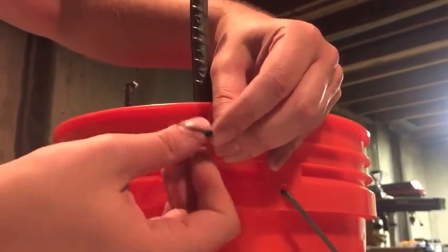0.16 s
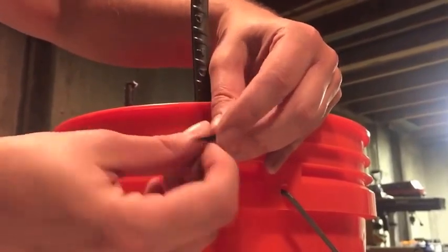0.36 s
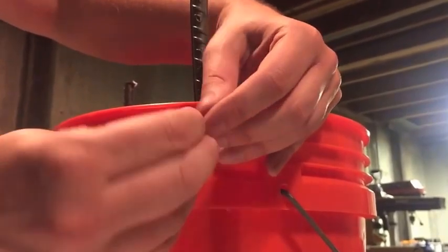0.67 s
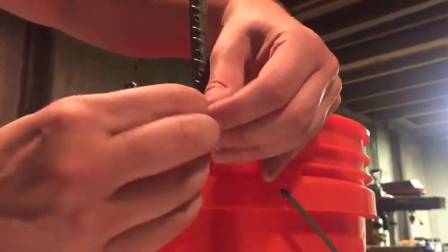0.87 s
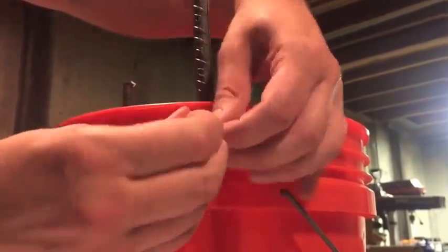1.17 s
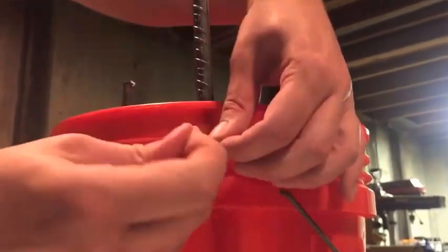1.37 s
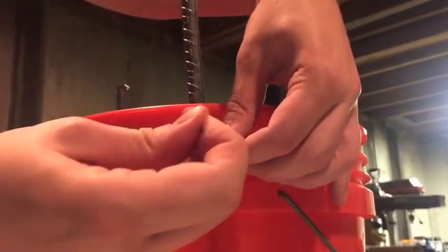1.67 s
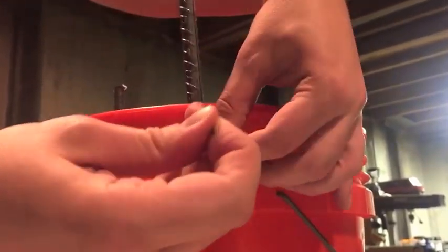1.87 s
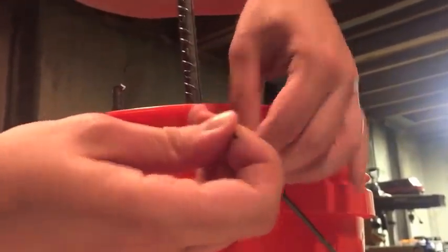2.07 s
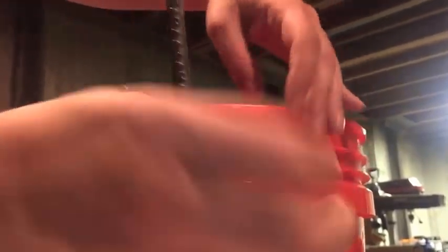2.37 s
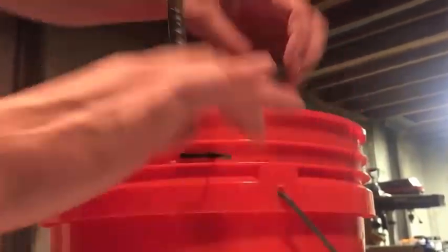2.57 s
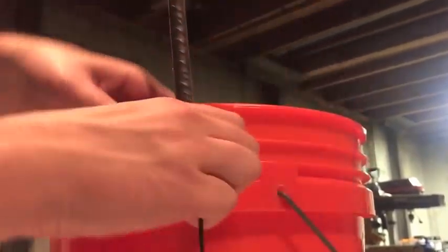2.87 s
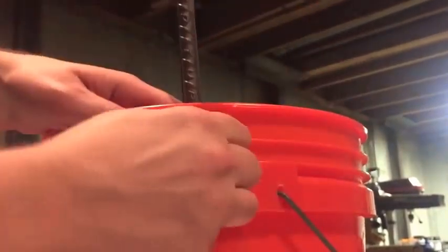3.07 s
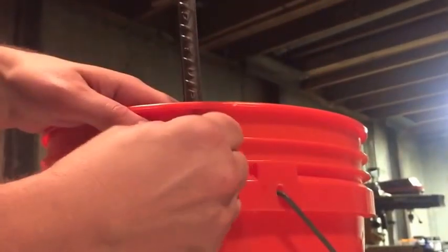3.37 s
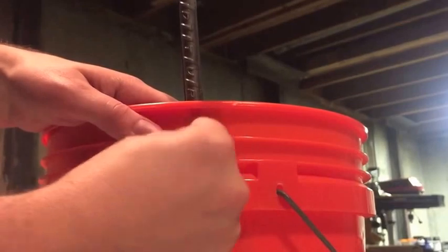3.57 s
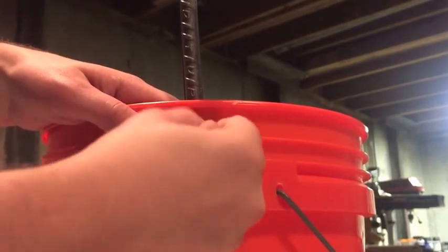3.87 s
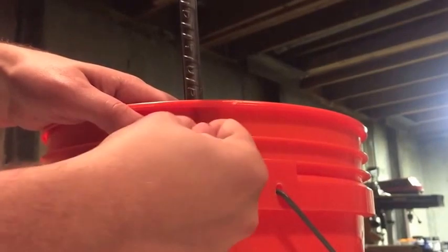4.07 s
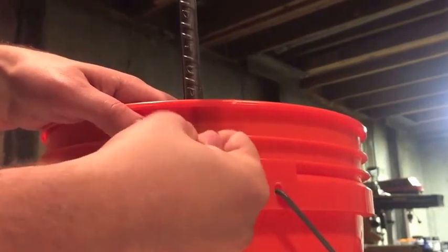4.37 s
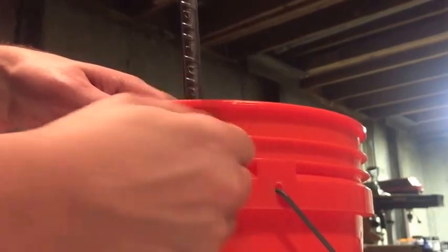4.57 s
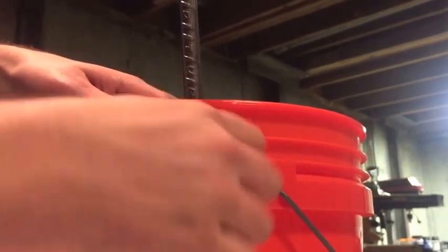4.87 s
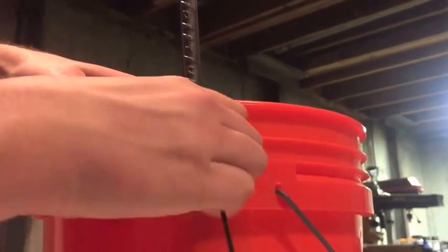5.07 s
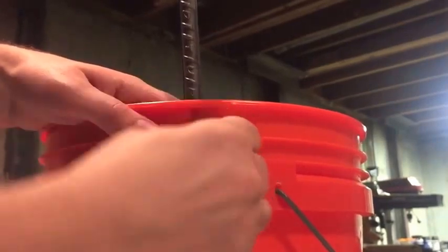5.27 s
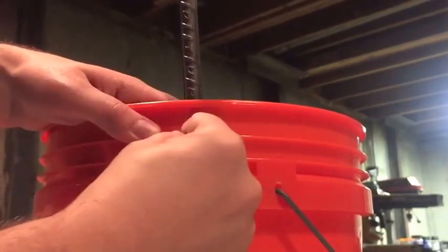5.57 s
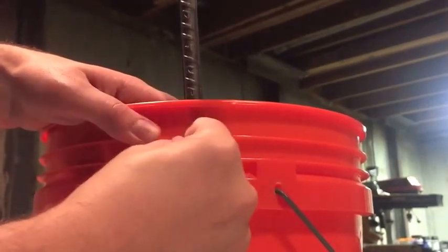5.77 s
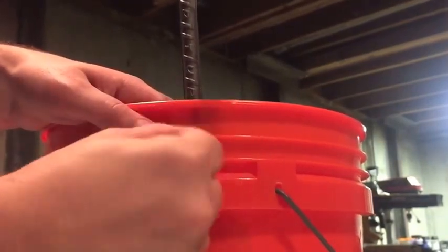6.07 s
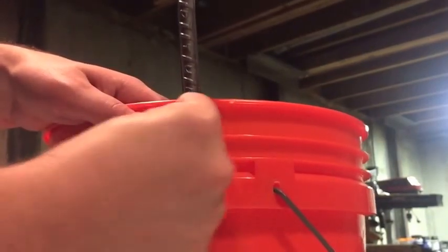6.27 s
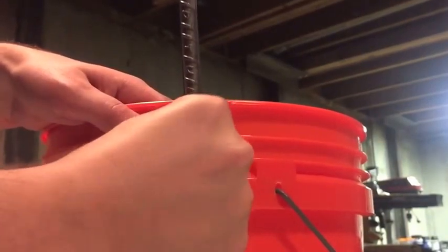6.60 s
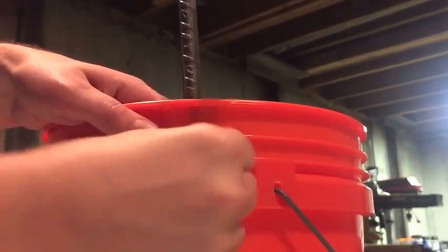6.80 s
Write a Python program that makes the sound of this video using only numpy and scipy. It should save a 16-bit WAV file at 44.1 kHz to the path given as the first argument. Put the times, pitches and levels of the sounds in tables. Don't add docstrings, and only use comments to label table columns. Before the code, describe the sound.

Close to a small microphone in a quiet workshop, faint finger rubs lead to a plastic zip tie being pulled: fine bright clicks run together in zips for about a second. Hands then knock and scuff a hollow plastic bucket. A second, tauter tie gives a short, louder ratcheting burst that rings the bucket wall. Handling thumps, strap ticks and a faint metallic ring follow over soft hiss and low hum.

```python
import sys
import numpy as np
from scipy import signal
from scipy.fft import rfft, irfft, next_fast_len
from scipy.io import wavfile
from scipy.ndimage import uniform_filter1d

SR = 44100
rng = np.random.default_rng(int(sys.argv[2]) if len(sys.argv) > 2 else 0)


def ratio_of_db(decibels):
    return 10 ** (np.asarray(decibels, float) / 20)


def file_out(sig):
    cols = np.atleast_2d(sig).T
    lim = np.clip(cols, -1, 1)
    pcm = np.round(lim * 32767).astype(np.int16)
    wavfile.write(sys.argv[1], SR, pcm)


N = 306054

# frequency in Hz, density in dB per Hz.
HISS_SPECTRUM = [(39, -48), (66, -13), (79, 7.5), (98, -20.5), (152, -6), (528, -23), (1530, -24),
                 (3510, -27), (4850, -30.5), (6400, -31.5), (9050, -33), (10400, -37), (14400, -33.5),
                 (16500, -62)]
# frequency in Hz, level in dB.
HUM_LINES = [(51.7, -64.5), (59, -80), (46.5, -92.5), (146, -87.5)]
# frequency in Hz, width in Hz, level in dB.
DRUM_MODES = [(66.7, 15.8, 0.5), (145.4, 15.5, 0.5), (203.8, 27.5, 0.5), (268, 89, -8.5), (395, 36, -22)]
# start in seconds, hold in seconds, second mode in dB,
# lowest mode over it in dB, upper modes over it in dB.
HAND_LOADS = [(-.05, 0.017, -60.5, 0, 2.5), (1.043, .03, -53, -9, -1), (1.22, 0.12, -68.5, -10, 9),
              (1.417, .04, -59.5, -1, 2), (1.54, 0.06, -55, -4.5, 6), (1.64, .1, -57, -4, 5),
              (1.78, 0.055, -50.5, -4, 10), (2.176, 0.057, -43, -3.5, -4), (2.363, 0.1, -57.5, 2.5, -5),
              (2.86, .05, -53, -1.5, -4), (2.951, 0.04, -50.5, 1, 3.5), (3.108, 0.083, -52.5, 1, -6.5),
              (3.448, 0.094, -45, -1, 4), (3.623, 0.13, -56, 4.5, -0.5), (3.84, 0.075, -60, -1, -6.5),
              (4.09, 0.061, -59, -1, 3), (4.214, 0.092, -52.5, 0.5, -12.5), (4.49, 0.018, -51, 5.5, -4),
              (4.589, 0.065, -54, -4, -28), (5.934, 0.026, -47.5, -8, -11), (6.206, 0.1, -58, -1, 5),
              (6.337, 0.074, -45, -2, -4.5), (6.492, 0.15, -51.5, -1, -7), (6.679, 0.15, -56.5, 4, -3.5)]
# time in seconds, peak in dB, pitch in Hz, T60 in seconds.
SOFT_BLOWS = [(0.009, -50, 62, 0.083), (2.203, -26.5, 162, 0.081), (2.279, -35.5, 64.6, 0.22),
              (2.872, -36, 176, 0.067), (2.929, -34, 186, 0.092), (3.188, -28.5, 172, 0.052),
              (3.229, -37, 145.6, 0.18), (3.352, -41.5, 164, 0.16), (4.246, -36, 163, 0.09),
              (4.397, -41.5, 76.6, 0.19), (4.518, -28.5, 167.6, 0.08), (4.558, -28, 155, 0.054),
              (5.7, -51, 90, .06), (5.769, -46.5, 187, 0.054), (5.785, -45.5, 75.5, 0.15),
              (5.952, -40.5, 157, 0.13), (6.297, -40, 193, 0.15), (6.381, -28.5, 157, 0.075),
              (6.508, -34, 143, 0.14), (6.648, -38, 187, 0.12)]
# frequency in Hz, width in Hz, level in dB.
WALL_MODES = [(361, 90, -7.5), (408, 64, -6.5), (512, 71, -7), (802, 26, -6.5), (947, 42, .5),
              (1069, 76, -3), (1128, 30.5, -5.5), (1272, 74, -2.5), (1518, 64, 1), (1695, 74, -3.5),
              (1810, 140, -2.1), (2190, 92, -3), (2347, 60, -2), (2643, 70, -6.5), (3000, 186, 2.5),
              (3510, 150, 2), (3990, 110, -9), (4750, 1050, 4)]
# start in seconds, length in seconds, rub in dB,
# centre in Hz, fizz over rub in dB.
SKIN_STROKES = [(0.4, 0.07, -69, 1120, -18), (.55, 0.059, -73.5, 1400, -20), (0.61, 0.2, -73, 1360, -20),
                (.82, .17, -69, 1700, -17), (.83, 0.2, -70, 840, -20), (.97, 0.12, -73, 1760, -15),
                (.27, .04, -77, 720, -20), (5.755, 0.073, -70.5, 1040, -20), (5.9, .05, -72, 2900, -10),
                (2.848, .08, -64, 1500, -20), (2.966, .045, -60, 2900, -10), (2.348, .06, -61, 1400, -25),
                (2.738, .05, -66, 950, -20), (6.5, .07, -66, 1300, -20), (2.15, .06, -63, 1600, -20),
                (2.495, .065, -62, 1520, -25), (2.06, 0.11, -63.5, 905, -22),
                (2.262, .12, -55.5, 1110, -24), (3.259, 0.091, -67, 1900, -2.5),
                (3.92, 0.15, -70, 3100, -11), (4.447, 0.078, -65.5, 2050, -8),
                (4.868, 0.125, -63.5, 2850, -7.5), (1.737, .03, -44, 900, -30),
                (4.989, .11, -63, 2400, -12), (6.6, 0.097, -70.5, 2100, -6.5), (5.41, 0.049, -67, 3100, -6),
                (5.88, .085, -71, 960, -8.5), (6.2, 0.16, -66.5, 1140, -11), (6.36, .06, -57, 1120, -27),
                (6.716, 0.053, -60.5, 2200, -15.5), (6.77, .07, -68, 1360, -25),
                (3.765, 0.045, -67, 2300, 2), (6.89, 0.066, -73, 2140, 5.5), (6.185, 0.09, -77, 2400, 4),
                (2.94, .13, -51.5, 1260, -20.5)]
KNOCKED_SCUFFS = [
    (0.0, 0.13, -61, 900, -12.5),
    (2.41, 0.24, -56.5, 1320, -27),
    (2.931, .1, -51, 1360, -15),
    (3.687, 0.21, -55.5, 1950, -15),
    (4.493, 0.06, -50, 1300, -20),
    (6.114, 0.26, -69.5, 2520, -3),
    (6.839, 0.077, -56, 1250, -14),
]
# time in seconds, peak in dB, centre in Hz, tick over body in dB.
PAD_KNOCKS = [(0.407, -55, 953, -23), (2.2, -41.5, 940, -32), (2.275, -48, 940, -24),
              (2.474, -50, 1540, -28), (2.875, -49, 910, -27), (3.009, -48, 900, -24),
              (3.028, -44.5, 950, -6), (4.103, -53.5, 824, -20), (4.187, -41.5, 980, -9),
              (4.492, -39.5, 850, -3), (6.109, -45, 2150, -7), (6.283, -51, 970, -27),
              (6.374, -52.5, 960, -24), (6.84, -47, 1200, -1.5)]
NAIL_KNOCKS = [(2.1, -66, 850, -3), (6.394, -50.5, 2600, -20), (5.994, -54, 2500, -20),
               (2.937, -44, 850, -23), (2.317, -39.5, 1170, -35), (2.402, -26, 1680, -17),
               (2.513, -54, 1400, -28), (2.926, -38, 1660, -0.5), (3.102, -53.5, 2920, -8),
               (5.341, -44, 2090, -5), (5.871, -57, 1010, -25), (6.001, -44.5, 2140, 1.5),
               (6.502, -53, 1200, -21), (6.65, -51.5, 1070, -28), (8.9, -50.5, 1300, -19)]
FIRST_HAUL_S = [1.058, 1.0686, 1.0763, 1.0843, 1.0947, 1.1141, 1.1251, 1.137, 1.3351, 1.3422, 1.3485,
                1.3558, 1.3655, 1.3719, 1.3775, 1.3819, 1.3873, 1.3925, 1.3987, 1.4032, 1.4083, 1.413,
                1.4187, 1.4254, 1.4309, 1.4388, 1.4448, 1.4513, 1.4596, 1.4694, 1.4754, 1.4832, 1.4934,
                1.5058, 1.5206, 1.528, 1.5337]
DRAWN_HOME_S = [1.5912, 1.5968, 1.602, 1.607, 1.6121, 1.6185, 1.625, 1.6334, 1.643, 1.6515, 1.6602, 1.6689,
                1.6787, 1.6865, 1.6941, 1.7033, 1.7122, 1.7226, 1.7323, 1.7422, 1.7498, 1.7565, 1.7632,
                1.7721, 1.7801, 1.7895, 1.798, 1.8063, 1.812, 1.8177, 1.8221, 1.8282, 1.8327, 1.8387,
                1.8438, 1.8507, 1.8615, 1.877, 1.9225]
SECOND_HAUL_S = [3.4509, 3.4617, 3.4725, 3.4808, 3.4902, 3.5072, 3.5345, 3.5487, 3.5586, 3.5683, 3.5784,
                 3.5898, 3.6007, 3.6145, 3.6398, 3.6775]
# time in seconds, count of teeth passed.
FAST_PULLS = [
    [(1.1459, 0), (1.1906, 11), (1.2052, 14), (1.2346, 19), (1.2586, 24), (1.2765, 29), (1.3094, 40),
     (1.3204, 43), (1.3298, 45)],
    [(1.5394, 0), (1.5616, 6), (1.5779, 12), (1.586, 14)],
]
# time in seconds, pawl snap in dB, load on the wall in dB,
# tension from 0 to 1, strap echo in ms.
FIRST_TIE = [
    (1.05, -49, -40, 0, 0.35),
    (1.14, -49.5, -42.5, 0, 0.23),
    (1.19, -50, -41.5, 0.02, 0.23),
    (1.255, -53.5, -41.5, 0.01, 0.19),
    (1.305, -53.5, -37.5, 0, 0.205),
    (1.37, -50, -41, 0.13, .17),
    (1.54, -47, -44, .12, 0.192),
    (1.74, -48.5, -44.5, 0.61, 0.17),
    (1.85, -43.5, -38.5, 0.38, 0.13),
]
SECOND_TIE = [
    (3.44, -35, -35, 0.99, 0.1),
    (3.53, -35, -36.5, 0.79, 0.2),
    (3.56, -34.5, -33.5, 0.94, 0.15),
    (3.6, -37, -32, 0.87, 0.18),
    (3.69, -40, -39.5, 1.04, .17),
]
# frequency in Hz, width in Hz, level in dB.
PAWL_TOP_MODES = [(11900, 1100, -6.5), (12940, 990, 0), (14300, 1280, 0), (14400, 1230, -9)]
PAWL_MID_MODES = [(5000, 1500, 0.5), (5800, 1700, -1), (7000, 1300, -15), (7170, 840, 4.5),
                  (8870, 820, -5.5), (9000, 190, -8), (9500, 1700, 9.5)]
# time in seconds,
# centre in Hz, lift in dB.
FREE_WALL = [(1.05, 2000, 6.5), (1.13, 1900, 4), (1.17, 1200, -1), (1.24, 1500, 8), (1.3, 1000, 3),
             (1.35, 1520, 6.5), (1.46, 910, 4.5), (1.56, 2280, 4.5), (1.72, 2300, -4), (1.749, 890, 18),
             (1.775, 1400, -4), (1.83, 3500, 2), (1.9, 1200, 3.5), (3.44, 3400, -1), (3.6, 3000, 1),
             (3.68, 2300, 3.5)]
# frequency in Hz, width in Hz, level in dB.
JOLT_MODES = [(204, 73, 1), (270, 56, 1), (417, 71, -9.5)]
# time in seconds, peak in dB, centre in Hz.
TIP_TICKS = [(3.037, -40, 5900), (4.1859, -49.5, 9210), (4.49, -40, 7180), (5.3428, -35, 5500),
             (6.0025, -41.5, 3020), (6.051, -51, 8500), (6.067, -52, 5500), (6.073, -56, 5500),
             (6.092, -39, 9700), (6.101, -46, 8600), (6.4194, -63, 4630)]
# frequency in Hz, level in dB, T60 in seconds.
BAR_MODES = [(2116, -63, .45), (2700, -70, .12), (3400, -76, .3), (4011, -70, .1), (4215, -61, .2),
             (560, -60, .1)]
# frequency in Hz, T60 in seconds.
ROOM_DECAY = [(200, 0.11), (1000, 0.26), (3000, 0.3), (8000, 0.16), (16000, 0.22)]


def evened(x):
    return x / np.sqrt(np.mean(x ** 2) + 1e-20)


def even_start(x):
    return x / np.sqrt(2 * np.mean(x[:110] ** 2))


def lumpy(size, window):
    return evened(uniform_filter1d(rng.standard_normal(size), window))


def decay(t, t60_s):
    return ratio_of_db(-60 * t / t60_s)


def read(points, hz):
    f, value = np.transpose(points)
    return np.interp(np.log(hz + 1), np.log(f + 1), value)


def add(mix, s, sound):
    part = mix[max(round(s * SR), 0):][:len(sound)]
    part += sound[:len(part)]


def resonate(x, hz, width_hz):
    r = np.exp(-np.pi * width_hz / SR)
    return 2 * signal.lfilter([1 - r], [1, -r * np.exp(2j * np.pi * hz / SR)], x + 1e-18).real


def band(x, lo_hz, hi_hz):
    return signal.sosfilt(signal.butter(2, [lo_hz, hi_hz], "band", fs=SR, output="sos"), x)


def ring(modes, lean_db=0, size=4096):
    hz, width_hz, db = np.transpose(modes)[:, :, None]
    t = np.arange(size) / SR
    sign = (-1) ** np.arange(len(hz))[:, None]
    sines = np.exp(-np.pi * width_hz * t) * np.sin(2 * np.pi * hz * t)
    return even_start((sign * ratio_of_db(db + lean_db) * sines).sum(0))


def floor():
    hiss_db = -69
    z, t = rfft(rng.standard_normal(next_fast_len(N))), np.arange(N) / SR
    hiss = irfft(z * ratio_of_db(read(HISS_SPECTRUM, np.linspace(0, SR / 2, len(z)))))[:N]
    drift_rad = .5 * lumpy(N, 9000)
    hum = sum(ratio_of_db(db) * np.sqrt(2) * np.sin(2 * np.pi * hz * t + drift_rad) for hz, db in HUM_LINES)
    return ratio_of_db(hiss_db) * evened(hiss) + hum


def drum():
    rise_s, rise_db, fall_db_per_s, rest_db = 0.042, 12.5, 121, -76.5
    step = 32
    t = np.arange(0, N, step) / SR
    weight = ratio_of_db(rest_db) * np.ones((3, len(t)))
    for s, hold_s, db, low_db, upper_db in HAND_LOADS:
        rising_db = rise_db * np.maximum(1 - (t - s) / rise_s, 0)
        falling_db = fall_db_per_s * np.maximum(t - s - rise_s - hold_s, 0)
        load = ratio_of_db(db - rising_db - falling_db) * ratio_of_db([[0], [low_db], [upper_db]])
        weight = np.maximum(weight, load)
    weight = np.repeat(weight, step, axis=1)[:, :N]
    force = ratio_of_db(2.5 * lumpy(N, 900)) * rng.standard_normal(N)
    low, second, *upper = [ratio_of_db(db) * evened(resonate(resonate(force, hz, width), hz, 3 * width))
                           for hz, width, db in DRUM_MODES]
    out = (weight * [second, low, sum(upper)]).sum(0)
    t = np.arange(SR // 4) / SR
    for s, peak_db, hz, t60_s in SOFT_BLOWS:
        swell = 1 - np.exp(-t / 0.003)
        add(out, s, ratio_of_db(peak_db + 1.0) * decay(t, t60_s) * swell * np.sin(2 * np.pi * hz * t))
    return out


def rubs():
    stroke_edge_db, scuff_end_db, scuff_bend = -20, -30.5, 1.27
    out, body = np.zeros(N), ring(WALL_MODES)
    rows = [(*r, True) for r in SKIN_STROKES] + [(*r, False) for r in KNOCKED_SCUFFS]
    for s, length_s, peak_db, hz, fizz_db, swells in rows:
        t = np.arange(0, 1, 1 / (length_s * SR))
        shape_db = stroke_edge_db * (2 * t - 1) ** 2 if swells else scuff_end_db * t ** scuff_bend
        grain = ratio_of_db(3.5 * np.clip(lumpy(len(t), 200), -2, 1.6))
        slip = grain * rng.standard_normal(len(t))
        contact = evened(resonate(resonate(slip, hz, 0.79 * hz), hz, 1.04 * hz))
        contact = contact + 0.37 * evened(band(slip, 300, 564))
        wall = evened(signal.oaconvolve(contact, body)[:len(t)])
        wall = evened(wall + 0.34 * contact)
        fizz = evened(band(slip, 2400, 10800) + 1.5 * resonate(slip, 6500, 1200))
        rub = wall + ratio_of_db(fizz_db) * fizz
        add(out, s, ratio_of_db(peak_db + shape_db) * rub * signal.windows.tukey(len(t), .1))
    return out


def knocks():
    pad_thud_db, pad_t60_s, nail_thud_db, nail_t60_s, rise_s = -2, 0.043, -21, 0.039, 0.001
    out, t, wall_hz = np.zeros(N), np.arange(4000) / SR, np.array(WALL_MODES)[:, :1]
    pads = [(*p, pad_thud_db, pad_t60_s) for p in PAD_KNOCKS]
    nails = [(*n, nail_thud_db, nail_t60_s) for n in NAIL_KNOCKS]
    for s, db, hz, tick_db, thud_db, t60_s in pads + nails:
        push, grit = rng.standard_normal((2, len(t)))
        push[0] = 4.9
        push = push * decay(t, t60_s)
        wall_ring = ring(WALL_MODES, -9 * abs(np.log2(wall_hz / hz)))
        wall = signal.oaconvolve(push, wall_ring)[:len(t)]
        contact = resonate(resonate(push, hz, 0.13 * hz), hz, 2.4 * hz)
        puff = band(band(push, 500, 2.43 * hz), 520, 2.44 * hz)
        wall = band(wall, 770, 3.7 * hz) * ratio_of_db(-40 * t / t60_s)
        body = evened(contact) + 0.44 * evened(puff) + .5 * evened(wall)
        body = body * (1 - np.exp(-t / rise_s))
        tick = band(band(grit, 3200, 8000), 3200, 22000) * decay(t, 0.013)
        thud = band(band(push, 283, 700), 215, 860)
        parts = [(0, body), (tick_db, tick), (thud_db, thud)]
        add(out, s, ratio_of_db(db) * sum(ratio_of_db(g) * v / abs(v).max() for g, v in parts))
    return out


def tooth_times():
    times = FIRST_HAUL_S + DRAWN_HOME_S + SECOND_HAUL_S
    for pull in FAST_PULLS:
        s, teeth = np.transpose(pull)
        count = np.arange(teeth[-1] + 1) + .045 * rng.standard_normal(round(teeth[-1]) + 1)
        times = np.append(times, np.interp(count, teeth, s))
    return np.sort(times)


def taut_punch():
    hz, rise_s, ring_s = 3300, .0004, .0007
    u = np.arange(180) / SR - rise_s
    envelope = np.where(u < 0, np.exp(-(3 * u / rise_s) ** 2), np.exp(-u / ring_s))
    return -np.cos(2 * np.pi * hz * u) * envelope


def shaken(rattle, modes):
    return even_start(np.convolve(rattle, ring(modes, size=400)))


def strap_echo(snap, delay_ms):
    hz = np.fft.rfftfreq(1024, 1 / SR)
    lap = np.exp(-2j * np.pi * hz * delay_ms / 1000)
    return irfft(rfft(snap, 1024) * (1 + 0.18 * lap + .35 * lap ** 4))


def ratchet():
    slack_top_db, taut_top_db = 9, -12.5
    slack_tilt_db, taut_tilt_db = -4.5, 4.5
    bounce_slack_s, bounce_taut_s, bounce_slack_db, bounce_taut_db = .0019, .0012, -10.5, -11
    thud_db, punch_db, slack_db = -1, 10, -19
    breakaway_db, scatter_db, wall_drift_db, free_octaves = 1, 1.05, 3, 0.36
    out, wall_hz = np.zeros(N), np.array(WALL_MODES)[:, :1]
    octaves = np.log2(wall_hz / 1500)
    t, crowd_t = np.arange(300) / SR, np.arange(1200) / SR
    chatter, blur = rng.standard_normal(300), rng.standard_normal(1200)
    grip = rng.standard_normal(wall_hz.shape)
    hand_s, *hand = np.transpose(FIRST_TIE + SECOND_TIE)
    free_s, *free = np.transpose(FREE_WALL)
    thud, punch, times = ring(JOLT_MODES, size=2600), taut_punch(), tooth_times()
    for s, wait_s in zip(times, np.diff(times, prepend=0)):
        snap_db, load_db, tension, delay_ms = (np.interp(s, hand_s, c) for c in hand)
        if wait_s > .5:
            snap_db += breakaway_db
        top_db = snap_db + slack_top_db + (taut_top_db - slack_top_db) * tension
        tilt_db = slack_tilt_db + (taut_tilt_db - slack_tilt_db) * tension
        levels_db = np.array([top_db, snap_db, load_db])
        top, mid, wall = ratio_of_db(levels_db + scatter_db * rng.standard_normal(3))

        chatter = .92 * chatter + .39 * rng.standard_normal(300)
        blur = .85 * blur + .53 * rng.standard_normal(1200)
        grip = .93 * grip + .37 * rng.standard_normal(wall_hz.shape)

        rattle = chatter * decay(t, .005)
        rattle[0] += 5.0
        snap = top * shaken(rattle, PAWL_TOP_MODES) + mid * shaken(rattle, PAWL_MID_MODES)
        snap = strap_echo(snap, delay_ms)
        add(out, s, snap)
        taut = np.clip(2 * tension, 0, 1)
        bounce_db = bounce_slack_db + (bounce_taut_db - bounce_slack_db) * taut
        bounce_s = bounce_slack_s + (bounce_taut_s - bounce_slack_s) * taut
        add(out, s + bounce_s, ratio_of_db(bounce_db) * snap)

        jolt = wall * ratio_of_db(slack_db * (1.5 - tension))
        add(out, s, jolt * ratio_of_db(punch_db) * punch)
        add(out, s, jolt * ratio_of_db(thud_db) * thud)

        free_hz, lift_db = (np.interp(s, free_s, c) for c in free)
        nearness = np.exp(-(np.log2(wall_hz / free_hz) / free_octaves) ** 2)
        uneven_db, detune = rng.standard_normal((2,) + wall_hz.shape)
        lean_db = tilt_db * octaves + lift_db * nearness + 2.15 * uneven_db + wall_drift_db * grip
        modes = np.array(WALL_MODES) * (1 + detune * [.006, 0, 0])
        add(out, s, wall * ring(modes, lean_db, size=2048))
        crowd = band(blur, 780, 3600) + .15 * lift_db * resonate(blur, free_hz, 520)
        add(out, s, wall * ratio_of_db(tilt_db + 3.5) * crowd * decay(crowd_t, 0.035))
    return out


def ticks():
    out, t = np.zeros(N), np.arange(800) / SR
    for s, db, hz in TIP_TICKS:
        push = rng.standard_normal(len(t)) * decay(t, .006)
        burst = resonate(resonate(push, hz, .35 * hz), hz, 0.7 * hz)
        add(out, s, ratio_of_db(db - 2.5) * burst / abs(burst).max())
    return out


def bar():
    tap_s = 6.109
    out, t = np.zeros(N), np.arange(SR // 2) / SR
    touch = ratio_of_db(4.5 * np.clip(lumpy(len(t), 350), -3, 1))
    tones = sum(ratio_of_db(db) * decay(t, t60_s) * np.sin(2 * np.pi * hz * t) for hz, db, t60_s in BAR_MODES)
    add(out, tap_s, touch * tones)
    return out


def room(x):
    taps, size = np.zeros(SR // 2), (SR // 2 - 220) // 20
    at = 200 + 20 * np.arange(size) + rng.integers(0, 20, size)
    taps[at] = rng.choice([-1., 1.], size)
    hz, t, z = signal.stft(taps, SR, nperseg=256)
    tail = signal.istft(z * decay(t, read(ROOM_DECAY, hz)[:, None]), SR, nperseg=256)[1]
    return signal.oaconvolve(x, tail / np.linalg.norm(tail))[:N]


def scene():
    room_db = -8.5
    low = floor() + drum()
    near = rubs() + knocks() + ratchet() + ticks() + bar()
    return (near + ratio_of_db(room_db) * room(near) + low)[None]


def roll_off(x):
    return signal.sosfilt(signal.butter(12, 17080, fs=SR, output="sos"), x)


def record(dry):
    bass_hz, edge_hz = 30, 16300
    x = signal.sosfilt(signal.butter(2, bass_hz, "high", fs=SR, output="sos"), dry)
    edge = signal.firwin(127, edge_hz, window=("kaiser", 5), fs=SR)
    x = signal.oaconvolve(x, edge[None], "same")
    return roll_off(x)


dry = scene()
out = record(dry)
file_out(out)
```